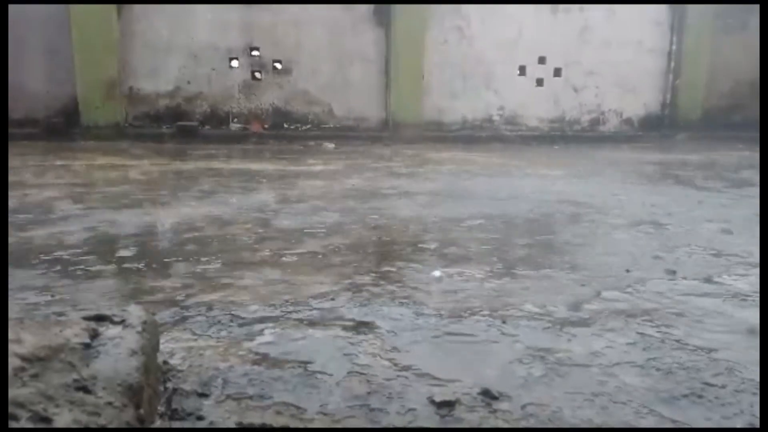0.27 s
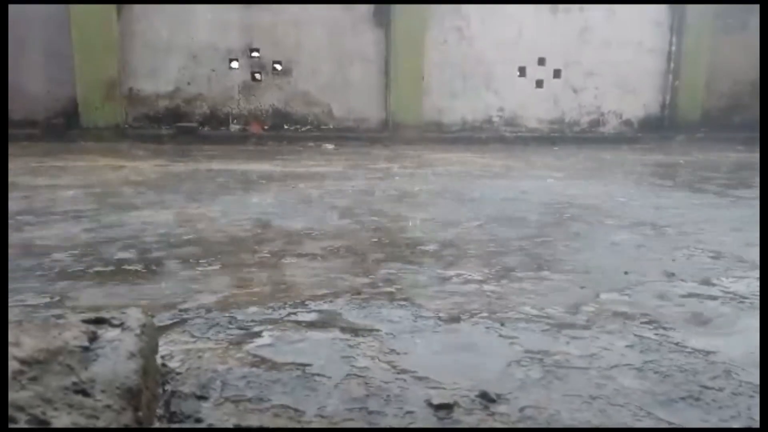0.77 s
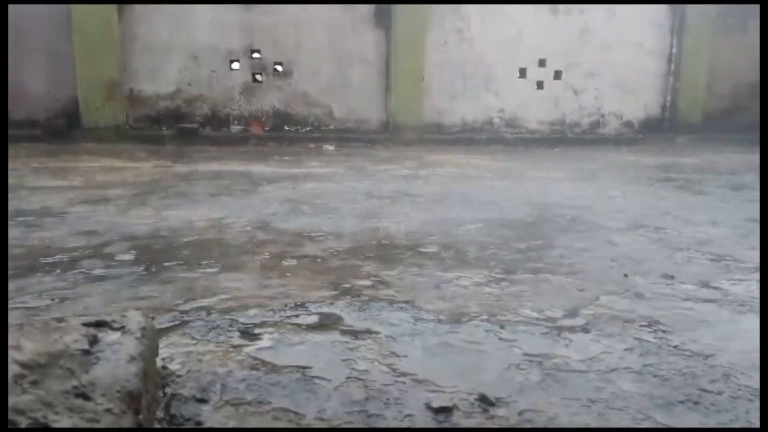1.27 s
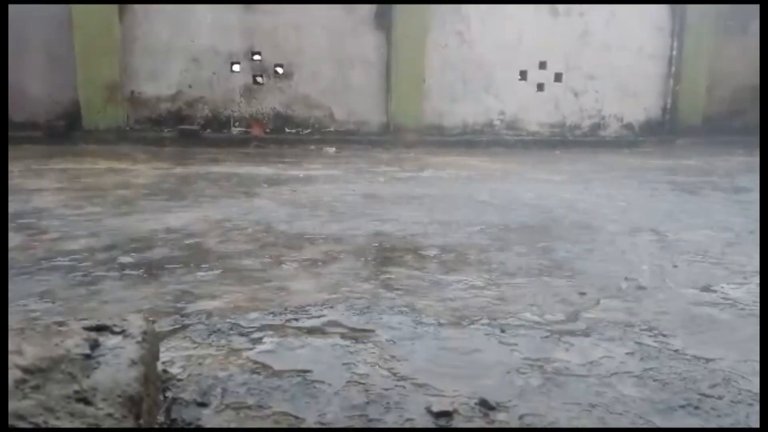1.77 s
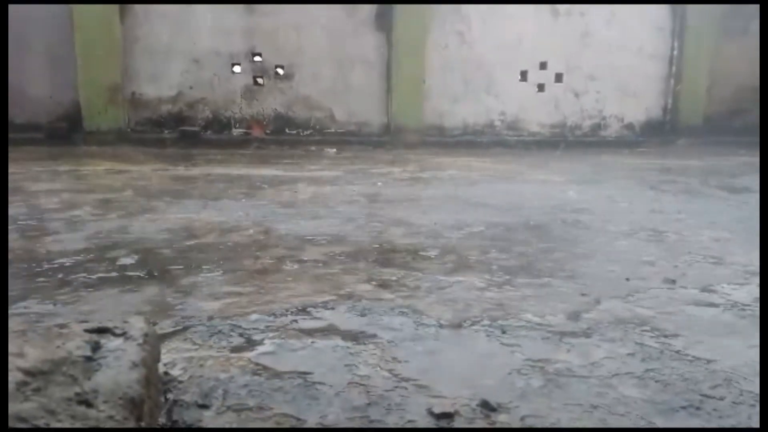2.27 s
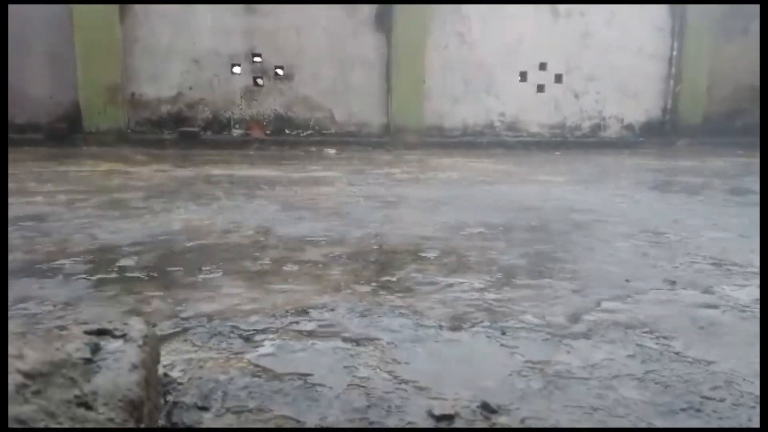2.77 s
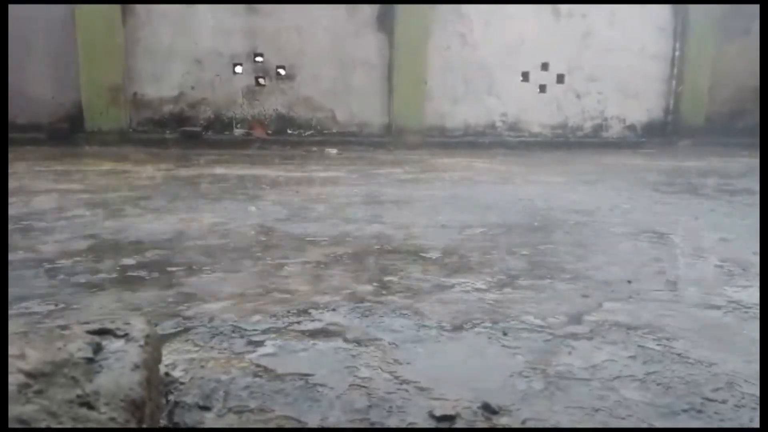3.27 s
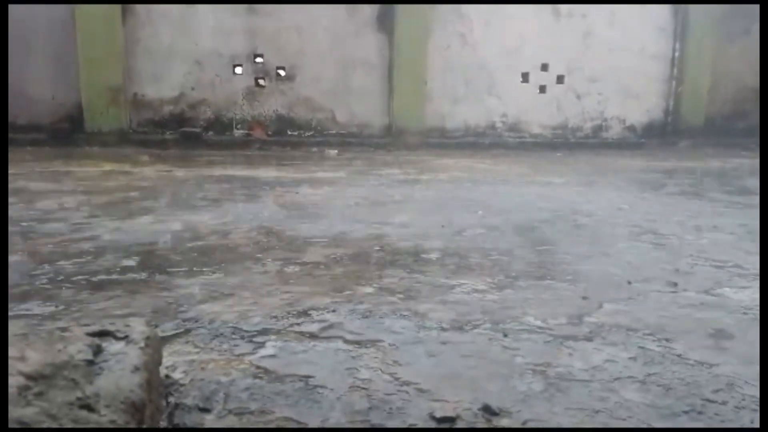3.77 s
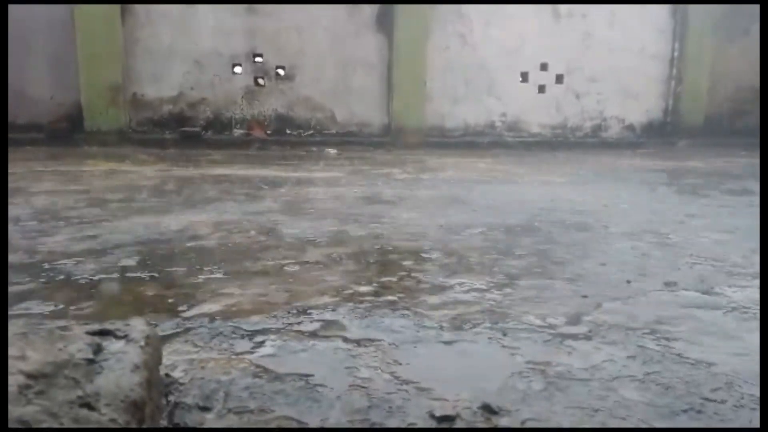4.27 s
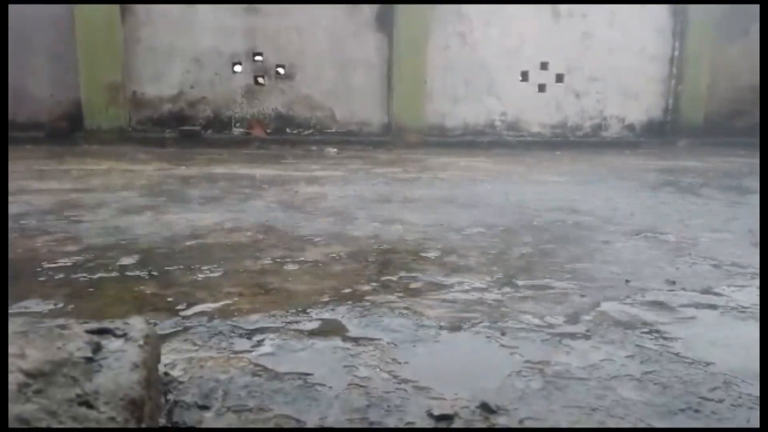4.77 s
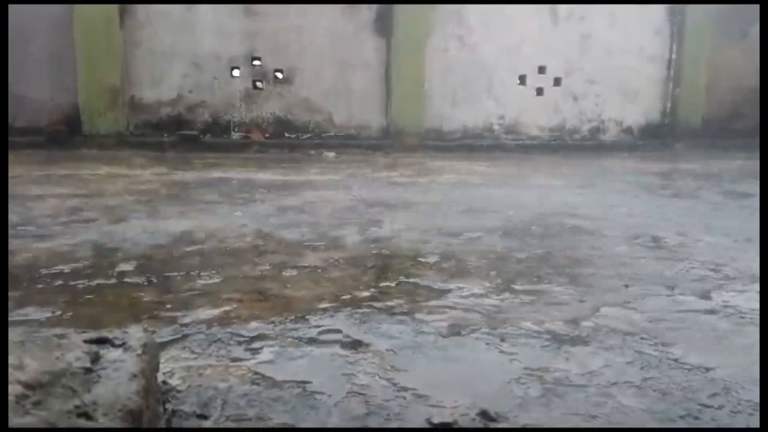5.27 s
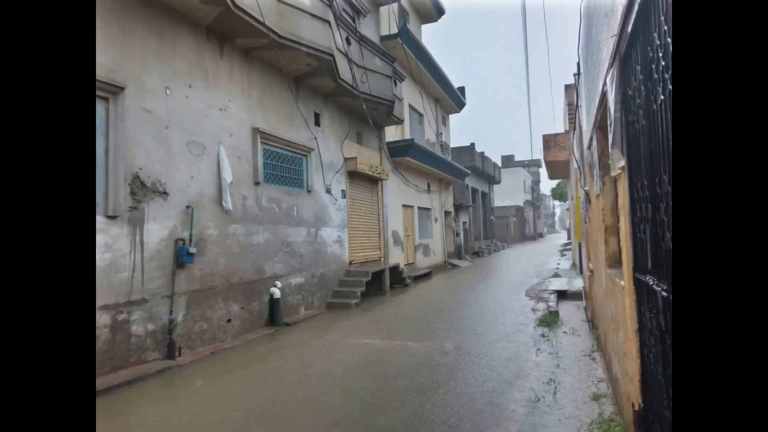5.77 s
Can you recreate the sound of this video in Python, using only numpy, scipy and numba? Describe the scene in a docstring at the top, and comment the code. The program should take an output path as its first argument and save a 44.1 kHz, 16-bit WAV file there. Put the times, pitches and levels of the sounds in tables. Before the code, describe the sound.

Heavy rain falls on wet concrete and puddles, a dull steady wash with dense patter, bubble plinks and close ticks. Wind thuds softly against a phone held low under shelter. Small splashes come midway. Near the end a faint steady whistle, two dull handling knocks and a rising airy whistle pass before everything stops dead.

```python
"""A wet concrete yard in heavy rain, heard by a phone held low under a shelter.
Far drops merge into a dull noise wash; nearer ones are damped sines (bubbles) and filtered impulses (ticks).
Noise rumbles and low thuds are gusts on the microphone port; larger splashes are decaying noise bursts.
Late on, two airy whistles pass as noise and tone in a moving resonance, and two knocks ring the phone's case.
The sound stops dead at 5.39 s and silence follows."""
import sys
import numpy as np
from scipy import signal
from scipy.fft import rfft, irfft, next_fast_len
from scipy.io import wavfile
from scipy.ndimage import uniform_filter1d
from numba import njit

SR = 44100
rng = np.random.default_rng(int(sys.argv[2]) if len(sys.argv) > 2 else 0)


def log_audio(samples):
    """Write samples as a 16-bit WAV file to the path given in sys.argv[1]."""
    # one column per channel
    frames = np.atleast_2d(samples).T
    # limit to full scale, then quantise
    limited = np.clip(frames, -1, 1)
    pcm = np.round(limited * 32767).astype(np.int16)
    wavfile.write(sys.argv[1], SR, pcm)


N = 265031

# Treble loss under the shelter. Each row: frequency in Hz, gain in dB.
SHELTER_LOSS = [(4800, -1.5), (5600, -2), (6600, -25.5), (9000, -37.5)]


def undb(db):
    """Amplitude is ten to the power of a twentieth of the level in dB."""
    return 10 ** (np.asarray(db) / 20)


def level(x, db):
    """Normalisation: scales a sound to an rms level in dB."""
    return x * undb(db) / np.sqrt(np.mean(x ** 2))


def curve(table):
    """Linear interpolation: joins rows of (s, ..) by straight lines, one value a sample for each column."""
    s, *columns = np.transpose(table)
    return [np.interp(np.arange(N) / SR, s, column) for column in columns]


def colour(x, points):
    """Zero-phase filtering: multiplies the spectrum by (Hz, dB) points joined over log frequency."""
    hz, db = np.transpose(points)
    size = next_fast_len(N)
    bins = np.maximum(np.arange(size // 2 + 1) * SR / size, 1)
    gain = undb(np.interp(np.log(bins), np.log(hz), db))
    return irfft(rfft(x, size) * gain, size)[:N]


def walk(rate):
    """Slow random modulation: levels held 1 / rate s, then averaged twice; spread near 1."""
    hold = int(SR / rate)
    steps = np.repeat(rng.standard_normal(N // hold + 1), hold)
    return 1.3 * uniform_filter1d(uniform_filter1d(steps, hold), hold)[:N]


@njit
def svf(x, hz, width):
    """Resonance: a state-variable band-pass whose centre and width move every sample."""
    y, band, low = np.empty(len(x)), 0., 0.
    for i in range(len(x)):
        g, k = np.tan(np.pi * hz[i] / SR), width[i] / hz[i]
        v = (band + g * (x[i] - low)) / (1 + g * (g + k))
        band, low, y[i] = 2 * v - band, low + 2 * g * v, k * v
    return y


@njit
def rings(count, s, size, hz, t60, glide):
    """Damped oscillation: sines that fade 60 dB in t60 while their pitch rises by the share glide."""
    out = np.zeros(count)
    for e in range(len(s)):
        start, length, phase = int(s[e] * SR), int(t60[e] * SR) + 2, 0.
        for i in range(min(length, count - start)):
            phase += 2 * np.pi * hz[e] * (1 + glide * i / length) / SR
            out[start + i] += size[e] * np.sin(phase) * 1000. ** (-i / length)
    return out


def wash():
    """Superposition: countless far drops sum to noise bands that swell together and flicker alone."""
    # Colour of the wash. Each row: frequency in Hz, gain in dB.
    wash_colour = [(500, -25), (760, -2), (1020, 0.5), (2220, -3), (2680, -1.5), (3350, -5), (4100, -2.5),
                   (4800, -2.5), (5410, -10), (5900, -16), (6300, -29.5), (7300, -36.5), (9000, -48.5),
                   (11700, -67), (19800, -120)]
    # Level of the band above about 5.6 kHz. Each row: time in seconds, relative level in dB.
    treble = [(0.0, -68), (0.49, -66), (0.88, -60), (1.45, -62), (1.56, -63), (2.26, -63), (2.39, -66),
              (3.08, -70.5), (3.17, -65), (3.32, -68), (3.55, -64.5), (3.65, -64), (4.01, -63.5),
              (4.42, -70.5), (4.59, -67), (4.78, -64), (5.03, -66), (5.2, -63.5)]
    treble_from_hz, treble_mean_db, patchy_db = 5600, -64.5, 3.5
    out, swell = 0, walk(12)
    treble_gain = curve(treble)[0] - treble_mean_db + np.minimum(2.8 * walk(18), 1.5)
    for hz in 740 * 2 ** np.arange(0, 3.7, 1 / 8):
        narrow = [(hz / 1.147, -40), (hz / 1.0336, -3), (hz, 0), (hz * 1.033, -3), (hz * 1.15, -40)]
        band = colour(rng.standard_normal(N), narrow)
        # the treble drops out and returns in patches, as after noise suppression
        patches = treble_gain + np.minimum(patchy_db * walk(7.4), 2.5)
        dropouts = patches / (1 + (treble_from_hz / hz) ** 12)
        flicker = np.minimum(1500 / hz * walk(9), 1.2) + 0.6 * walk(13) + 2.2 * walk(40)
        out = out + band * undb(.5 * swell + flicker + dropouts)
    return level(colour(out, wash_colour), -2.2)


def patter(per_s, spread_db, cycles, low_hz, high_hz, glide):
    """Random arrivals: middle-distance drops ring at random pitches; most are faint, none is huge."""
    when, pitch, size, sign = rng.random((int(per_s * N / SR), 4)).T
    hz = low_hz * (high_hz / low_hz) ** pitch
    gain = undb(spread_db * np.minimum(-np.log(1 - size), 4)) * np.sign(sign - .5)
    return rings(N, when * N / SR, gain, hz, cycles / hz, glide)


def snaps(per_s, spread_db):
    """Impulse response: drops on concrete a few steps away are dull inward snaps at random times."""
    when, size = rng.random((int(per_s * N / SR), 2)).T
    hits = np.zeros(N)
    hits[(when * N).astype(int)] = -undb(spread_db * np.minimum(-np.log(1 - size), 4))
    return colour(hits, [(200, -20.0), (1000, 3.0), (5000, -1.5)])


def rain():
    """Superposition by distance: the wash, middle drops and spray share one slow rise and fall."""
    # Strength of the rain. Each row: time in seconds, gain in dB.
    strength = [(0.0, -42), (0.44, -44.5), (1.33, -43), (1.66, -43), (2.27, -42.5), (2.66, -43.5),
                (3.0, -41.5), (3.79, -44), (4.1, -42), (4.53, -44), (4.79, -42.5), (5.1, -43.5)]
    crackle = patter(per_s=1100, spread_db=4.5, cycles=3.6, low_hz=880, high_hz=5230, glide=0.096)
    bubbles = patter(per_s=420, spread_db=7.0, cycles=33, low_hz=877, high_hz=5100, glide=0.15)
    gurgle = patter(per_s=68, spread_db=4.0, cycles=22, low_hz=325, high_hz=930, glide=0.074)
    spray = patter(per_s=70, spread_db=8.0, cycles=2.4, low_hz=6015, high_hz=14500, glide=0.)
    middle = undb(-14.0) * crackle + undb(-28.5) * bubbles + undb(-25.5) * gurgle
    middle = middle + undb(10.0) * snaps(per_s=260, spread_db=3.5)
    bright = undb(-44.0) * colour(spray, [(15800, -3.5), (16100, -24.5)])
    return (wash() + colour(middle, SHELTER_LOSS) + bright) * undb(curve(strength)[0])


def murmur():
    """Amplitude modulation: low rain noise in two ranges, each swelling and dropping out on its own."""
    # Level of the murmur. Each row: time in seconds, lower range in dB, upper range in dB.
    murmur_levels = [(0.0, -50.5, -55), (0.05, -61, -71), (0.19, -55, -56), (0.23, -69.5, -56.5),
                     (0.5, -56.5, -66), (0.63, -65, -72), (0.67, -67, -65), (0.7, -61, -54),
                     (0.91, -66, -61.5), (1.14, -51.5, -68), (1.23, -60, -54), (1.3, -62, -76),
                     (1.35, -50, -57), (1.42, -81, -53), (1.49, -56.5, -61), (1.75, -55, -57),
                     (1.87, -67, -53), (2.15, -53, -57), (2.19, -69, -56), (2.33, -50.5, -54),
                     (2.44, -53, -54), (2.59, -62.5, -67.5), (2.87, -58, -52), (2.92, -79, -62),
                     (2.99, -53, -61), (3.03, -75, -55), (3.06, -53.5, -52), (3.36, -66.5, -59.5),
                     (3.47, -58, -51), (3.56, -56, -64), (3.6, -50, -54), (3.68, -73, -59.5),
                     (4.01, -57.5, -54), (4.27, -68, -57), (4.56, -64, -59), (4.6, -54, -56),
                     (4.67, -66, -59.5), (4.95, -63, -54)]
    # The two ranges. Each row: lowest band in Hz, upper limit in Hz.
    ranges = [(200, 422), (430, 755)]
    out = 0
    for (low_hz, high_hz), db in zip(ranges, curve(murmur_levels)):
        part = 0
        for hz in np.geomspace(low_hz, high_hz, 7)[:-1]:
            narrow = [(hz / 1.07, -45), (hz * 1.0, -3), (hz * 1.06, 0), (hz * 1.13, -3), (hz * 1.35, -45)]
            band = colour(rng.standard_normal(N), narrow)
            part = part + band * undb(np.minimum(7 * walk(11), 3) + 2 * walk(30))
        out = out + level(part, 0) * undb(db)
    return colour(out, [(120, -30), (180, 0), (900, 0), (1500, -60)])


def hiss():
    """Electronic noise: the phone's own faint coloured hiss, gently unsteady."""
    # Colour of the hiss. Each row: frequency in Hz, gain in dB.
    hiss_colour = [(5000, -42.5), (7000, -5.5), (9000, -13), (12500, -15), (13600, -19), (15200, -5),
                   (15850, -4), (16000, -52)]
    return level(colour(rng.standard_normal(N), hiss_colour), -81.5) * undb(1.4 * walk(12))


def wind():
    """Turbulent pressure: eddies rumble on the port; each gust swells them and pushes the port inward."""
    # Wind between gusts. Each row: time in seconds, rumble level in dB.
    breeze = [(0.0, -61), (0.32, -60.5), (1.17, -54.5), (2.2, -54.5), (2.41, -55.5), (2.88, -56),
              (3.28, -60.5), (4.09, -55), (4.19, -67), (4.46, -49.5), (5.23, -67), (5.3, -56)]
    # Colour of the rumble. Each row: frequency in Hz, gain in dB.
    rumble_colour = [(25, -32.5), (50, 2.5), (70, 4.5), (100, 10.5), (160, 9.5), (250, 0), (400, -16),
                     (1200, -84)]
    # Gusts. Each row: start in seconds, thud size in dB, starting pitch in Hz, added rumble level in dB.
    gusts = [(0.126, -64, 103, -49.5), (0.666, -25, 113, -46), (0.738, -39, 135, -51),
             (1.031, -45, 119, -64), (1.156, -48, 94, -50), (1.569, -31, 102, -50), (1.649, -47, 130, -52),
             (1.844, -44, 110, -55), (1.934, -45, 114, -58), (1.969, -40, 105, -52), (2.087, -37, 90, -63),
             (2.734, -41.5, 99, -62), (2.821, -46, 110, -53), (2.927, -39.5, 110, -56),
             (2.949, -40.5, 125, -56), (2.965, -43, 75, -59), (3.014, -37.5, 80, -63),
             (3.029, -39, 85, -59), (3.089, -44, 115, -60), (3.92, -42, 106, -49), (4.126, -49, 118, -51),
             (4.187, -54, 104, -46.5), (4.57, -28, 108, -44), (4.581, -40, 94, -42), (4.603, -29, 127, -44),
             (4.615, -45, 109, -44), (4.806, -46, 93, -52), (5.136, -39, 110, -50), (5.214, -35, 106, -45)]
    puff_rise_s, puff_fall_s = 0.0089, 0.029
    # in turns of the starting pitch, so low thuds last longer
    rise_turns, sag_turns = 0.46, 3
    power, thuds, t = undb(2 * curve(breeze)[0]), 0, np.arange(N) / SR
    for s, db, hz, puff_db in gusts:
        late = t - s - puff_rise_s
        puff = np.exp(-(late / np.where(late < 0, puff_rise_s, puff_fall_s)) ** 2)
        power = power + undb(2 * puff_db) * puff
        after = np.maximum(t - s, 0) * hz
        turns = sag_turns * (1 - np.exp(-after / sag_turns))  # the pitch sags
        swell = after / rise_turns * np.exp(1 - after / rise_turns)
        thuds = thuds - undb(db) * swell * np.sin(2 * np.pi * turns)
    eddies = 0
    for hz in np.geomspace(45, 360, 8):  # each size of eddy comes and goes alone
        eddy = colour(rng.standard_normal(N), [(hz / 1.6, -30), (hz, 0), (hz * 1.6, -30)])
        eddies = eddies + eddy * undb(3.2 * walk(14)) / np.sqrt(hz)
    rumble = level(colour(eddies, rumble_colour), 0) * np.sqrt(power)
    return rumble + thuds


def plinks():
    """Bubble resonance: near trapped bubbles ring briefly with rising pitch, and a wall reflects a weaker copy."""
    # Bubbles. Each row: start in seconds, level in dB before the shelter's loss, starting pitch in Hz.
    bubble_hits = [(0.019, -21.5, 2560), (0.0647, -14.5, 4860), (0.401, -33, 3960), (0.4122, -30, 4100),
                   (0.478, -38, 4400), (0.682, -26, 3270), (0.7684, -25, 2550), (0.9286, -16.5, 3830),
                   (1.0928, -29, 4260), (1.1089, -22.5, 2020), (1.1858, -25, 4170), (1.238, -22.5, 5340),
                   (1.308, -25, 4130), (1.347, -22.5, 4700), (1.436, -25, 4300), (1.4978, -24, 3380),
                   (1.5055, -27, 2810), (1.54, -21, 5370), (1.5535, -26, 3100), (1.5644, -27, 4600),
                   (1.6275, -26, 3580), (2.133, -27, 4800), (2.21, -28, 4400), (2.243, -24.5, 4800),
                   (2.4372, -28, 4560), (2.7173, -29, 3940), (2.7962, -21.5, 4600), (2.824, -26, 3370),
                   (3.0859, -23.5, 2810), (3.1182, -24, 1780), (3.205, -28, 4650), (3.291, -31, 4700),
                   (3.332, -32, 4600), (3.556, -26.5, 4630), (4.343, -23.5, 4220), (4.645, -27, 4070),
                   (4.658, -29.5, 4180), (4.8574, -22, 2580), (4.9044, -30, 3340), (5.0207, -37, 4830),
                   (5.022, -31, 4480), (5.1345, -25, 3430), (5.2444, -36.5, 2300)]
    s, db, hz = np.transpose(bubble_hits)
    t60 = np.full(len(s), 0.0034)
    direct = rings(N, s, undb(db), hz, t60, 0.79)
    reflected = undb(-16.5) * rings(N, s + 0.001018, undb(db), hz, 1.2 * t60, 0.092)
    return colour(direct + reflected, SHELTER_LOSS)


def drips():
    """Bubble resonance: the smaller the bubble the higher it rings, here fading over 38 cycles."""
    # Tiny droplets. Each row: start in seconds, level in dB before colouring, starting pitch in Hz.
    droplets = [(0.0646, -38, 6350), (0.6103, -55, 8890), (0.618, -51, 6760), (0.8529, -49, 7060),
                (0.9285, -44.5, 8000), (1.0724, -43.5, 7400), (1.2382, -53, 7200), (1.5414, -55, 6800),
                (1.7396, -55, 7880), (1.9878, -56, 7240), (2.038, -44.5, 6900), (3.087, -52, 6770),
                (3.2586, -50, 9300), (3.5002, -58, 7540), (3.5575, -48, 6350), (4.0387, -45, 8060),
                (4.7557, -54, 6980), (5.1349, -56.5, 7020)]
    s, db, hz = np.transpose(droplets)
    ringing = rings(N, s, undb(db), hz, 38 / hz, 0.066)
    return colour(ringing, [(3500, -21.0), (6000, 6.5), (9500, 0.0), (12000, -14.5)])


def ticks():
    """Impulse response: close landings are one-sample inward snaps coloured bright, with a dull body."""
    # Close drops. Each row: time in seconds, bright impulse in dB, dull impulse in dB, both before colouring.
    landings = [(0.0647, -35, -45.5), (0.074, -47, -36.5), (0.4802, -57, -28), (0.525, -67, -50),
                (0.6113, -60, -35), (0.619, -58, -29), (0.8325, -53, -29.5), (0.9285, -67, -26),
                (0.974, -54, -27.5), (1.057, -68, -33), (1.2648, -49, -31), (1.3084, -46, -41),
                (1.3948, -41, -31), (1.426, -54, -45), (1.4725, -53, -30.5), (1.862, -55, -30),
                (2.064, -59, -30), (2.121, -56, -26.5), (2.204, -55, -36), (2.412, -62, -43),
                (2.438, -63, -33), (2.585, -67, -37), (2.669, -59, -39), (2.702, -56, -44),
                (2.7182, -43.5, -35), (2.7595, -51, -32), (2.8465, -42, -28.5), (3.087, -66, -28),
                (3.118, -68, -32.5), (3.137, -65.5, -28.5), (3.163, -70, -33), (3.2575, -59, -51),
                (3.3317, -53, -26.5), (3.5005, -55, -30.5), (4.168, -58, -41), (4.602, -72, -36),
                (4.6185, -61, -28.5), (4.8563, -69, -31), (4.905, -68, -36), (5.1053, -48, -27.5),
                (5.135, -62, -28.5), (5.248, -49, -27)]
    # Colour of the bright part. Each row: frequency in Hz, gain in dB.
    bright_colour = [(5000, 9), (6000, 26.5), (8000, 12), (12500, 14.5), (13700, 4.5), (15200, 24),
                     (15900, 12.5), (16100, -18)]
    # Colour of the dull body. Each row: frequency in Hz, gain in dB.
    body_colour = [(300, 7.5), (1000, 14.5), (2500, 12.5), (5200, 17.5), (6500, -8), (9000, -41)]
    faint_per_s, faint_db, faint_spread_db = 6.6, -67.5, 2.5
    s, db, body_db = np.transpose(landings)
    when, size = rng.random((int(faint_per_s * N / SR), 2)).T
    hits, bodies = np.zeros(N), np.zeros(N)
    hits[(when * N).astype(int)] = -undb(faint_db - faint_spread_db * np.log(1 - size))
    hits[(s * SR).astype(int)] = -undb(db)
    bodies[(s * SR).astype(int)] = -undb(body_db)
    return colour(hits, bright_colour) + colour(bodies, body_colour)


def yard(near, db, t60):
    """Reverberation: the walls return a scattered, duller tail, made by convolution with decaying noise."""
    t = np.arange(SR // 2) / SR
    tail = rng.standard_normal(len(t)) * 1000. ** (-t / t60) * (t > .002)
    echo = signal.fftconvolve(near, tail)[:N]
    return near + undb(db) * colour(echo, [(7000, 0), (12000, -9.0)])


def splashes():
    """Exponential decay: a larger slop of water is a dull, crackly noise burst that dies quickly."""
    # Slops. Each row: start in seconds, level in dB before colouring, centre in Hz, 60 dB decay in seconds.
    slops = [(3.081, -30.5, 996, 0.04), (3.098, -33, 1400, 0.06), (3.134, -35, 450, 0.025),
             (3.158, -32, 1308, 0.062), (4.601, -25.5, 950, 0.02), (3.083, -33, 1970, 0.055)]
    out, t = 0, np.arange(N) / SR
    for s, db, hz, t60 in slops:
        crackly = level(rng.standard_normal(N) * undb(2.0 * walk(300)), db)
        burst = crackly * (t > s) * 1000. ** (-np.maximum(t - s, 0) / t60)
        dull = [(hz / 4, -22), (hz / 1.9, 4), (hz * 1.0, 6), (hz * 2.4, -5), (7000, -40), (12000, -70)]
        out = out + colour(burst, dull)
    return out


def whistles():
    """Moving resonance: filtered air noise; the narrower the band, the more a steady tone takes over."""
    # One table a whistle. Each row: time in seconds, pitch in Hz, filter width in Hz,
    # level in dB before the shelter's loss.
    whistle_paths = [
        [(4.65, 1546, 50, -60), (4.67, 1550, 50, -47), (4.74, 1545, 50, -48), (4.785, 1530, 60, -49.5),
         (4.81, 1520, 80, -59), (4.93, 1510, 80, -60)],
        [(5.05, 750, 500, -59), (5.1, 1150, 650, -54), (5.15, 1620, 600, -48.5), (5.2, 1900, 600, -45.5),
         (5.25, 2220, 560, -44), (5.3, 2490, 340, -43), (5.34, 2590, 220, -42), (5.4, 2630, 200, -42.5)],
    ]
    out, t = 0, np.arange(N) / SR
    for path in whistle_paths:
        hz, width, db = curve(path)
        noise = svf(svf(rng.standard_normal(N), hz, width), hz, width)
        air = noise / np.sqrt(np.pi / 4 * width / SR)  # evens out the loudness over width
        tone = np.sqrt(2) * np.sin(2 * np.pi * np.cumsum(hz) / SR)
        share = np.clip((60 / width) ** 2, 0, .7)
        sounding = (t > path[0][0]) * (t < path[-1][0])
        out = out + (np.sqrt(share) * tone + (1 - share) * air) * undb(db) * sounding
    return colour(out, SHELTER_LOSS)


def knocks():
    """Modal vibration: a short inward push, then the phone's case swings back and rings in low modes."""
    # Knocks. Each row: time of the push's peak in seconds, size in dB, push length in seconds.
    pushes = [(4.9837, -18.5, 0.0012), (5.0173, -22.5, 0.00069)]
    # Modes of the case. Each row: frequency in Hz, level in dB against the push, 60 dB decay in seconds.
    modes = [(63, -15.5, 0.12), (121, -4, 0.0099), (240, -24.5, 0.017)]
    out, t = np.zeros(N), np.arange(N) / SR
    for s, db, push in pushes:
        out -= undb(db) * np.exp(-.5 * ((t - s) / (0.26 * push)) ** 2)
        for hz, mode_db, t60 in modes:
            size = undb([db + mode_db])
            out += rings(N, np.array([s + push]), size, np.array([1. * hz]), np.array([t60]), 0.)
    return out


def scene():
    """Linear superposition: rain at all distances, wind, splashes, whistles, knocks and hiss add up."""
    steady = rain() + murmur() + hiss() + wind()
    near = yard(plinks() + drips() + ticks(), db=-30, t60=0.08)
    passing = yard(whistles(), db=-35, t60=0.33)
    return (steady + near + splashes() + passing + knocks())[None]


def record(dry):
    """Band limiting: the phone drops the deepest bass, cuts the sound off hard and keeps no extreme treble."""
    low_cut_hz, top_hz, stop_s = 52, 16800, 5.3935
    thin = signal.sosfilt(signal.butter(3, low_cut_hz, "high", fs=SR, output="sos"), dry)
    kept = thin * (np.arange(N) < stop_s * SR)
    return signal.sosfilt(signal.ellip(10, .2, 80, top_hz, fs=SR, output="sos"), kept)


dry = scene()
out = record(dry)
log_audio(out)
```